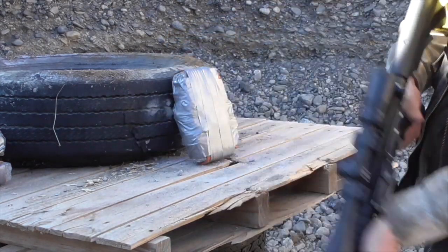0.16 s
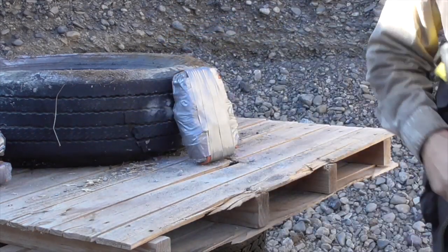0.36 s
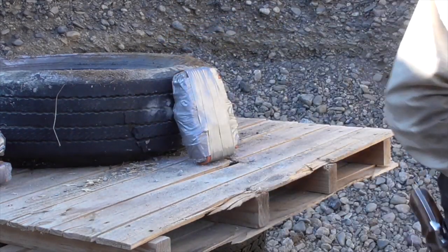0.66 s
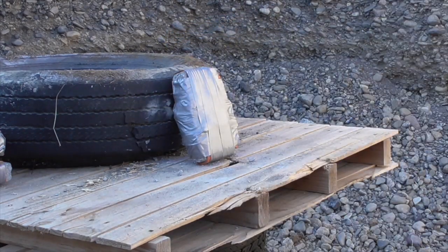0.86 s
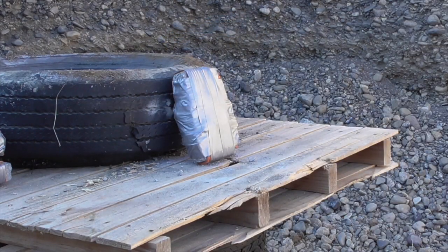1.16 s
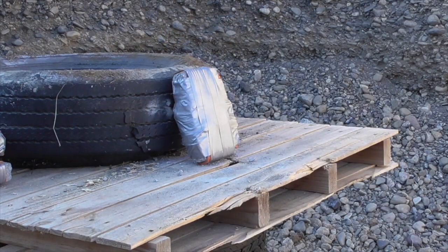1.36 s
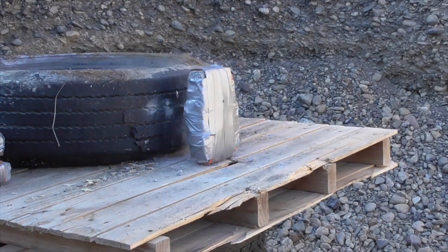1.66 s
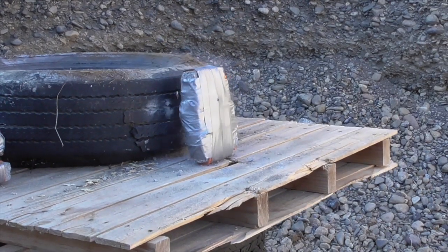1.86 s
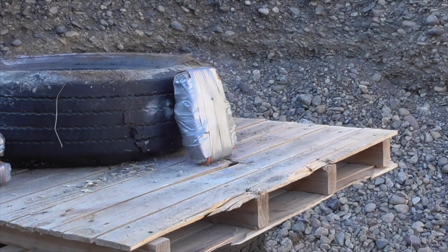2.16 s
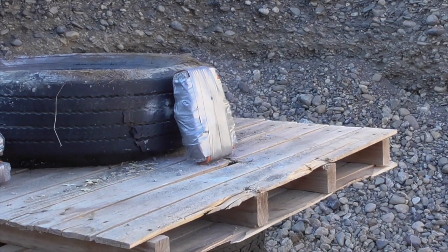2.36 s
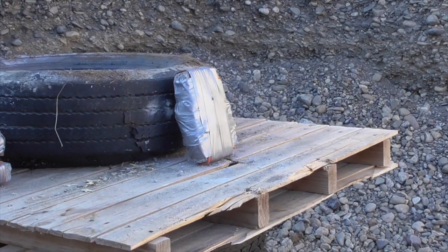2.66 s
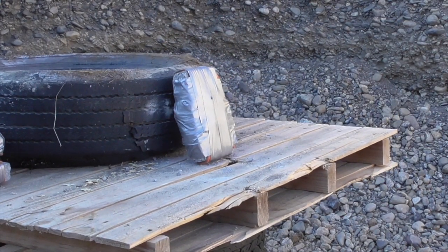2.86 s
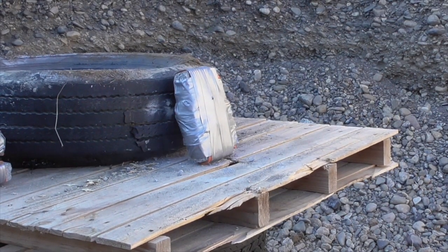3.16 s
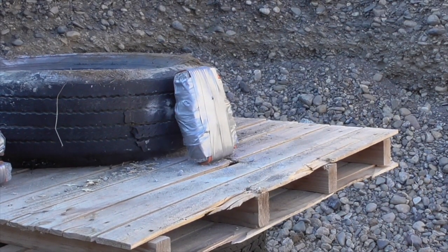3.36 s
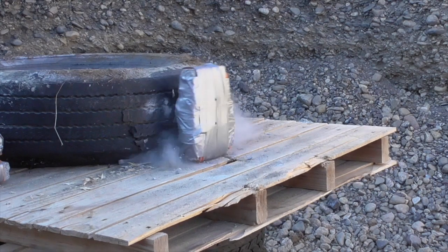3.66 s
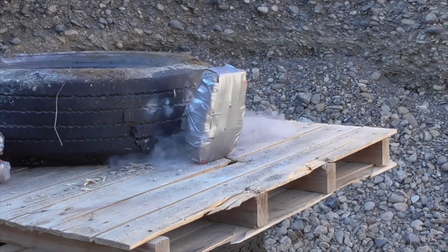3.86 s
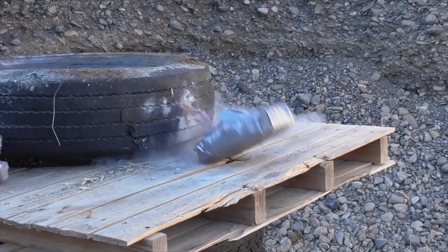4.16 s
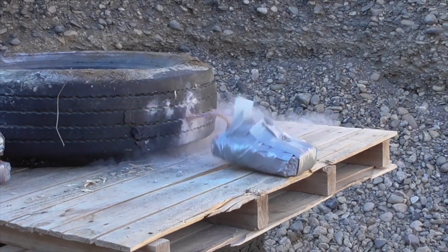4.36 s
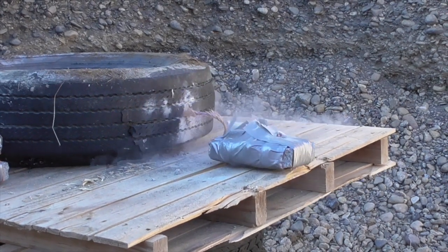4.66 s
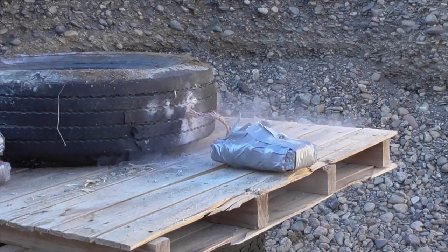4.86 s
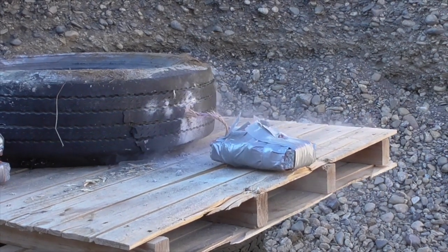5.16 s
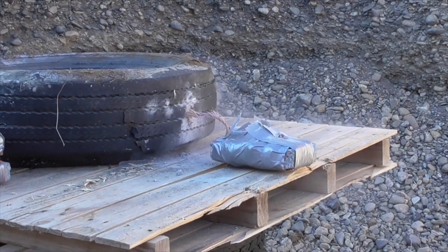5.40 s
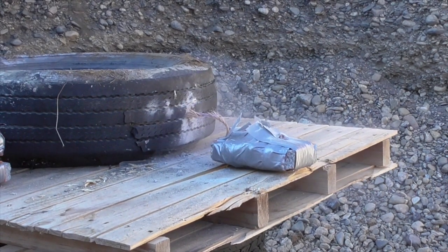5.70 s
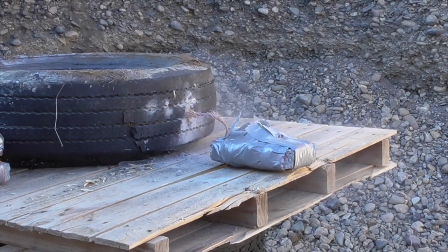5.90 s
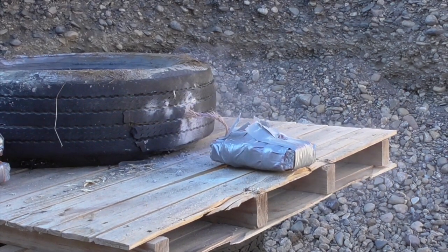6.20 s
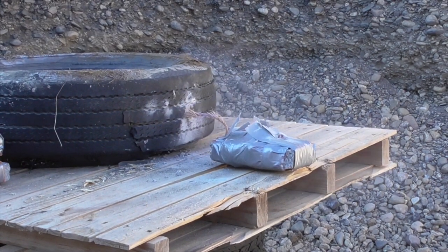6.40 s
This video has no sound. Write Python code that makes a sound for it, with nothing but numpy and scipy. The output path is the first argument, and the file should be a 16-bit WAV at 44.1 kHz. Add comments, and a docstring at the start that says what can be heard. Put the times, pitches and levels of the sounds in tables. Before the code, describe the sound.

Two rifle shots boom outdoors about two seconds apart, each followed by raining grit, snapping pebbles and knocks on wood.

```python
"""In a gravel pit, two rifle shots are fired at a taped package leaning on a tyre on a wooden pallet.
First the shooter shuffles aside. Each shot cracks, booms between the banks and rolls away.
Thrown grit hisses back down with snapping pebbles and crumbling clods. Stones and the package
knock on the pallet's boards, and spent brass cases ring as they hop on the gravel."""
import sys
import numpy as np
from scipy import signal
from scipy.fft import rfft, irfft, next_fast_len
from scipy.io import wavfile
from scipy.ndimage import uniform_filter1d, map_coordinates

SR = 44100
rng = np.random.default_rng(int(sys.argv[2]) if len(sys.argv) > 2 else 0)


def pcm_store(signal):
    """Save signal as 16-bit PCM."""
    levels = np.round(np.clip(np.atleast_2d(signal), -1, 1) * 32767)
    wavfile.write(sys.argv[1], SR, levels.astype(np.int16).T)


N = 288325

# The shots. Each row: start in seconds, level in dB.
SHOTS = [(1.5442, 0), (3.7044, 0)]
# Loudness shapes of a shot's four stages and the rifle's slide. Each lists delay, rise, hold and
# fade in seconds, then level in dB. A fade time (t60) is how long a sound takes to drop 60 dB.
CRACK_SHAPE = (0, .0003, .003, .02, -11)
FIZZ_SHAPE = (.002, .005, .035, .118, -16)
BOOM_SHAPE = (.0025, .005, .058, .135, -11)
ROLL_SHAPE = (.03, .03, .08, 1.05, -37.5)
SLIDE_SHAPE = (0, .002, .14, .7, -57.5)
# Hollow notes in the boom. Each row: pitch in Hz, level in dB, peak time and fade in seconds.
HOLLOW_NOTES = [(107, -17.5, .055, .25), (330, -7.5, .009, .09), (350, -13, .054, .12),
                (505, -6, .036, .08), (450, -15, .075, .17), (630, -12, .06, .07), (790, -16, .035, .1)]
# Metal left ringing by the blast. Each row: pitch in Hz, level in dB, fade in seconds.
METAL_RINGS = [(345, -35, 1.3), (877, -34, .7)]
# Echoes off far slopes. Each row: delay and length in seconds, start and end pitch in Hz, level in dB.
ECHOES = [(.27, .13, 145, 135, -44), (.437, .032, 265, 285, -37), (.487, .07, 245, 185, -39.5)]

# One shower of grit per shot. Each row: hiss and patter in dB, usual flight and end time in seconds.
SHOWERS = [(-41.3, -48.5, .7, 3.14), (-44, -49.5, .82, 6.6)]
# Larger pebbles, clods, the package and boots landing. Each row: start in seconds, level in dB.
PEBBLES = [(2.0087, -20), (2.114, -25), (2.7581, -23), (2.8604, -28), (2.9337, -23), (3.0874, -20),
           (3.4675, -43), (4.1577, -30), (4.2986, -19), (4.4618, -17), (4.8567, -27), (4.9496, -23),
           (5.0025, -18), (5.0594, -23), (5.1317, -30), (5.2794, -27), (5.3944, -28), (5.5593, -32),
           (5.7887, -15), (5.882, -27), (6.1574, -22), (6.2617, -17.5), (6.5059, -26)]
CLODS = [(1.964, -36), (2.297, -33), (2.318, -30), (2.455, -33), (2.478, -28), (4.655, -36), (4.947, -30),
         (5.288, -38), (5.562, -40), (5.677, -33), (5.793, -32), (6.087, -31), (6.197, -33), (6.337, -37),
         (6.441, -33), (6.525, -21)]
PACKAGE_THUDS = [(4.33, -31), (4.52, -43)]
STEPS = [(0.124, -37), (0.172, -35), (0.531, -36), (0.611, -30), (0.687, -38), (0.71, -35)]
# Blows on the pallet. Each row: start in seconds, level in dB, favoured pitch in Hz.
KNOCKS = [(1.933, -35, 1600), (2.009, -26, 1400), (2.162, -35, 470), (2.224, -20, 470), (2.365, -27, 484),
          (2.444, -22.5, 410), (4.28, -34, 1100), (4.319, -26, 420), (4.367, -14, 930), (4.385, -26, 360),
          (4.478, -23, 1100), (4.616, -35, 428), (4.68, -32, 1400), (4.789, -35, 1030), (4.916, -31, 720),
          (5.002, -29, 2200), (5.933, -27.5, 290)]
# The notes of the pallet's boards. Each row: pitch in Hz, width in Hz, level in dB.
BOARD_NOTES = [(135, 60, -7), (240, 70, -8), (370, 30, -4), (455, 20, 2), (585, 45, -7), (770, 80, -6),
               (870, 60, -7), (1090, 80, -7), (1400, 200, -15), (3400, 3000, -15)]
# Brass cases landing. Each row: start in seconds, level in dB, pitch in Hz,
# first hop in seconds (0 for a single ping with no hops added).
CASES = [(2.012, -19, 10300, 0), (2.365, -18.5, 11800, .508), (4.3156, -28, 11600, 0),
         (4.3914, -25, 11500, .12), (4.7531, -17.5, 11500, .555), (5.197, -37, 9100, 0)]
# Swings of arms and legs. Each row: middle and half length in seconds, level in dB.
SWINGS = [(.08, .1, -60), (.26, .09, -54), (.625, .035, -54), (.85, .04, -60), (.982, .035, -58),
          (6.17, .12, -58)]

# The tone of each noise, from bass to treble. Each row: frequency in Hz, level in dB.
CRACK_TONE = [(300, -25), (2500, -12), (5500, 0), (10000, -2), (16000, -14)]
FIZZ_TONE = [(800, -30), (1800, -2), (2700, -3), (4500, 0), (11000, -1), (15500, -6)]
BOOM_TONE = [(30, -34), (70, -11), (110, 0), (215, -6), (340, 0), (760, 0), (1000, -6), (1350, -8.5),
             (1900, -23), (4000, -45)]
ROLL_TONE = [(30, -24), (130, 0), (300, -2), (550, -9), (750, -18), (2500, -35), (15000, -44)]
SAND_TONE = [(700, -35), (1800, -16), (2700, -15), (4200, -3.5), (6000, -3.5), (7300, 0), (11500, -3),
             (15500, -14)]
PATTER_TONE = [(35, -30), (70, -10), (252, -2), (650, -5), (1300, -7), (2300, -15), (4000, -45)]
PEBBLE_TONE = [(400, -15), (2500, -14), (4000, -3), (8500, 0), (12000, -3), (16000, -15)]
WOOD_SLAP_TONE = [(400, -12), (1150, 1), (1900, -7), (3600, 0), (7000, -5), (13000, -20)]
SCUFF_TONE = [(50, -23), (200, 0), (620, -6), (950, 2), (1200, -6), (1900, -17), (6000, -35)]
CLOTH_TONE = [(1500, -16), (3300, 0), (9500, -1), (15000, -12)]
STEP_TONE = [(60, -20), (230, 0), (650, -7), (2800, -32)]
SLIDE_TONE = [(1500, -14), (2350, -17), (2600, 6), (2900, -12), (3700, 0), (4700, -1), (5700, -16),
              (12000, -28)]
AIR_TONE = [(25, -6), (60, 0), (300, -1), (700, -5), (950, 0), (1400, -9), (2800, -15), (7000, -11.5),
            (10000, -7)]
# How alike left and right sound. Each row: frequency in Hz, likeness (1 the same, 0 unrelated).
STEREO_LIKENESS = [(130, .3), (380, .75), (900, .45), (4500, .4), (8500, -.1), (15000, 0)]

# Flight times vary more for sand than for heavy grains; one octave here is a doubling of the time.
SAND_OCTAVES, GRAIN_OCTAVES = .65, .55


def shots():
    """Each shot cracks, fizzes, booms and rolls; the pit answers both with the same boom and echoes."""
    out, t = np.zeros((2, N)), np.arange(SR) / SR
    early = t[:SR // 3]
    boom = pit_boom(early)
    echoes = far_echoes(t)
    metal = sum(amp(db - 60 * t / t60) * np.sin(2 * np.pi * hz * t) for hz, db, t60 in METAL_RINGS)
    for s, db in SHOTS:
        crack = noise(CRACK_TONE, len(early)) * burst(early, *CRACK_SHAPE)
        # countless stones scatter the shock wave into a dense fizz
        fizz = noise(FIZZ_TONE, len(early), spiky_db=2) * burst(early, *FIZZ_SHAPE)
        roll = noise(ROLL_TONE, len(t)) * burst(t, *ROLL_SHAPE) * amp(2 * wobble(35, len(t)))
        add(out, s, amp(db) * (crack + fizz + boom))
        add(out, s, amp(db) * (echoes + metal + roll))
    return out


def pit_boom(t, wander=.75, build_s=.013):
    """The blast bounces between banks, tyre and pallet: a roar in which hollow notes swell in turn."""
    out = steady(noise(BOOM_TONE, len(t)), .012) * burst(t, *BOOM_SHAPE)
    for hz, db, peak_s, t60 in HOLLOW_NOTES:
        swell = np.exp(-(np.minimum(t - peak_s, 0) / min(build_s, peak_s / 2)) ** 2)
        fade = amp(db - 60 * np.maximum(t - peak_s, 0) / t60)
        phase = 2 * np.pi * (hz * t + rng.random()) + wander * stereo_wobble(55, len(t))
        out += swell * fade * np.sin(phase)
    return out


def far_echoes(t, rough=.6, flutter_per_s=90):
    """Far slopes send back only the bass, as short gliding rumbles roughened by the broken ground."""
    out = np.zeros((2, len(t)))
    flutter = lambda: rough * stereo_wobble(flutter_per_s, len(t))
    for delay, length, start_hz, end_hz, db in ECHOES:
        progress = np.clip((t - delay) / length / 2 + .5, 0, 1)
        phase = 2 * np.pi * np.cumsum(start_hz + (end_hz - start_hz) * progress) / SR
        rumble = np.sin(phase) * (1 + flutter()) + np.cos(phase) * flutter()
        out += amp(db) * np.sin(np.pi * progress) ** 4 * rumble
    return out


def grit(tick_db=-3, ticks_per_s=70, tick_scatter_db=5.5, clump_db=2):
    """Sand thrown up by the bullet rains down in clumps; coarser grains tick and patter through it."""
    hiss_gain, patter_gain = np.zeros((2, N))
    for (shot_s, _), (hiss_db, patter_db, flight_s, end_s) in zip(SHOTS, SHOWERS):
        hiss_gain += amp(hiss_db) * grit_flow(shot_s, flight_s, end_s, SAND_OCTAVES)
        patter_gain += amp(patter_db) * grit_flow(shot_s, flight_s, end_s, GRAIN_OCTAVES)
    landings = rng.random(N) < ticks_per_s / SR
    strengths = amp(tick_scatter_db * np.clip(rng.standard_normal(N), -2, 2))
    # each landing gets a very short tail
    contacts = signal.lfilter([1], [1, -np.exp(-1 / (.0007 * SR))], landings * strengths)
    ticks = spread(contacts * rng.standard_normal((2, N)), lambda hz: amp(along(PEBBLE_TONE, hz)))
    sand = amp(clump_db * wobble(40, N) - 1.7) * noise(SAND_TONE, N, spiky_db=3)
    patter = amp(2.5 * wobble(35, N)) * noise(PATTER_TONE, N, spiky_db=5)
    return hiss_gain * (sand + amp(tick_db) * ticks) + patter_gain * patter


def grit_flow(shot_s, flight_s, end_s, octaves, first_landing_s=.26, trickle_db=-11.8):
    """How thickly one shot's grit falls: it swells, then thins to a trickle running off the bank."""
    age = np.maximum(np.arange(N) / SR - shot_s, 1e-3)
    onset = 1 / (1 + (first_landing_s / age) ** 8)
    shower = onset * np.exp(-(np.log2(age / flight_s) / octaves) ** 2 / 2)
    trickle = amp(trickle_db) * np.minimum(age / flight_s, 1) ** .85
    return np.hypot(shower, trickle) * until(end_s)


def pebbles(snap_db=-2.8, crunch_db=-17, strays_per_shot=28, stray_db=-35, shortest_flight_s=.22):
    """Each pebble snaps as it lands and shifts its neighbours with a crunch."""
    out, t = np.zeros((2, N)), np.arange(SR // 8) / SR
    stones = list(PEBBLES)
    # small stray stones drop at random, harder while the shower is thick
    for (shot_s, _), (_, _, flight_s, end_s) in zip(SHOTS, SHOWERS):
        flow = grit_flow(shot_s, flight_s, end_s, SAND_OCTAVES)
        for _ in range(strays_per_shot):
            s = rng.uniform(shot_s + shortest_flight_s, min(end_s, N / SR))
            flow_db = 20 * np.log10(flow[int(s * SR)])
            stones.append((s, rng.normal(stray_db, 3) + .4 * flow_db))
    for s, db in stones:
        snap = steady(noise(PEBBLE_TONE, len(t)), .002)
        snap *= burst(t, .0005, .0002, .0006, .0055, db + snap_db)
        crunch = noise(PEBBLE_TONE, len(t), spiky_db=4) * burst(t, 0, .001, .005, .045, db + crunch_db)
        add(out, s, snap + crunch, pan_db=rng.normal(0, 2))
    return out


def pallet(knock_db=-8, focus_octaves=1.05, slap_db=-10.5, hard_hz=950, soft_hz=500):
    """Stones and the toppling package knock on the boards; stiff spots ring briefly and add a slap."""
    out, t = np.zeros((2, N)), np.arange(SR // 4) / SR
    for s, db, spot_hz in KNOCKS:
        # each spot brings out the board notes near its own pitch
        colour = lambda hz: boards(hz) / (1 + (np.log2((hz + 1) / spot_hz) / focus_octaves) ** 2)
        stiffness = max(spot_hz / soft_hz, 1)
        clatter = rng.standard_normal((2, len(t))) * burst(t * stiffness, 0, .0003, .016, .12, 0)
        ring = spread(clatter, colour)
        loudest = np.sqrt(uniform_filter1d(np.mean(ring ** 2, axis=0), SR // 80).max())
        hardness = min(spot_hz / hard_hz, 1) ** 3
        slap = noise(WOOD_SLAP_TONE, len(t), spiky_db=3)
        slap *= burst(t * stiffness ** 2, 0, .001, .025, .19, db + slap_db)
        add(out, s - .001, amp(db + knock_db) * ring / loudest + hardness * slap)
    # the heavy package bends the whole frame
    for s, db in PACKAGE_THUDS:
        thud = steady(noise([(35, -25), (80, 0), (220, -22)], len(t)), .03)
        add(out, s, thud * burst(t, 0, .006, .03, .3, db))
    return out


def boards(hz):
    """How the boards answer each frequency: they shake most near their own notes."""
    return sum((-1) ** k * amp(db) * 1j * hz * width / (pitch ** 2 - hz ** 2 + 1j * hz * width)
               for k, (pitch, width, db) in enumerate(BOARD_NOTES))


def brass(upper_hz=15300, hop_ratio=.23, hop_loss_db=16, shimmer=.95, roughness=1.7):
    """A spent case pings and hops, its two notes shimmering as it tumbles."""
    out, t = np.zeros((2, N)), np.arange(SR // 3) / SR
    strike = burst(t, 0, .0002, .007, t60=.1, db=-1)
    tumble = burst(t, 0, .01, .04, t60=.3, db=-20)
    upper = burst(t, 0, .001, .05, t60=.22, db=-48.5)
    for s, db, hz, hop_s in CASES:
        if not hop_s:  # a lone touch gives a short, rough ping
            add(out, s, amp(db) * case_note(t, hz, roughness) * strike)
            continue
        # each hop is shorter and each ping softer than the last
        for hop in range(3):
            landing_s = s + hop_s * (1 - hop_ratio ** hop) / (1 - hop_ratio)
            ping = amp(db - hop_loss_db * np.sqrt(hop)) * case_note(t, hz, shimmer)
            add(out, landing_s, ping * (strike + tumble) + upper * case_note(t, upper_hz, shimmer))
    return out


def case_note(t, hz, blur):
    """One note of a brass case, wavering in pitch and loudness."""
    side_shift = np.array([[0], [np.pi / 3]])
    phase = 2 * np.pi * hz * t + blur * wobble(500, len(t)) + side_shift
    return np.sin(phase) * amp(2.5 * wobble(120, len(t)))


def clods(rise_s=.004, hold_s=.01, t60=.05):
    """A clod lands and bursts into a short splash of sand."""
    out, t = np.zeros((2, N)), np.arange(SR // 8) / SR
    for s, db in CLODS:
        add(out, s, noise(SAND_TONE, len(t), spiky_db=3) * burst(t, 0, rise_s, hold_s, t60, db))
    return out


def shooter(shuffle_db=-65, shuffle_end_s=1.11, step_db=-7):
    """Boots scuff and tread while a jacket swishes with every swing, over a steady shuffle whose sound drops
    away quickly at 1.11 s."""
    clock = np.arange(N) / SR
    swings = sum(amp(db) * np.exp(-((clock - s) / half) ** 2) for s, half, db in SWINGS)
    shuffle = amp(shuffle_db) * until(shuffle_end_s)
    scuff_gain = np.hypot(amp(4) * swings, amp(8) * shuffle)
    scuffs = amp(2.8 * wobble(40, N)) * scuff_gain * noise(SCUFF_TONE, N, spiky_db=4)
    jacket = np.hypot(swings, shuffle) * noise(CLOTH_TONE, N, spiky_db=3)
    out, t = scuffs + jacket, np.arange(SR // 5) / SR
    for s, db in STEPS:
        add(out, s, steady(noise(STEP_TONE, len(t)), .01) * burst(t, 0, .003, .009, .09, db + step_db))
    return out


def rifle_slide(sag_octaves_per_s=1.9):
    """The rifle scrapes along the sleeve; the scrape sinks in pitch as it slows."""
    out, t = np.zeros((2, N)), np.arange(SR) / SR
    travel = np.cumsum(2 ** (-sag_octaves_per_s * t))
    sleeve = noise(SLIDE_TONE, len(t), spiky_db=2)
    scrape = np.array([map_coordinates(side, [travel], mode="wrap") for side in sleeve])
    add(out, 0, scrape * burst(t, *SLIDE_SHAPE))
    return out


def air(air_db=-64):
    """The faint, even hush of open air."""
    return amp(air_db) * noise(AIR_TONE, N)


def amp(db):
    """Turn decibels into a gain."""
    return 10 ** (np.asarray(db) / 20)


def along(points, hz):
    """Read between rows of (Hz, value), with octaves evenly spaced."""
    freqs, values = np.transpose(points)
    return np.interp(np.log(hz + 1), np.log(freqs + 1), values)


def wobble(rate, size):
    """A smooth curve through `rate` random points a second."""
    knots = rng.standard_normal(4096)
    coarse = np.arange(0, size + 32, 32)
    return np.interp(np.arange(size), coarse, map_coordinates(knots, [coarse * rate / SR], mode="wrap"))


def stereo_wobble(rate, size):
    """A separate wobble for left and right."""
    return np.array([wobble(rate, size), wobble(rate, size)])


def filtered(x, response):
    """Scale each frequency in x by response(hz)."""
    size = x.shape[-1]
    padded = next_fast_len(size + 1024, True)
    return irfft(rfft(x, padded) * response(np.fft.rfftfreq(padded, 1 / SR)), padded)[..., :size]


def spread(pair, response):
    """Filter two unrelated signals and blend them to left and right, at an average power of 1."""
    def blend(hz):
        angle = np.arccos(np.clip(along(STEREO_LIKENESS, hz), -1, 1)) / 2
        return response(hz) * np.array([np.cos(angle), np.sin(angle)])
    mid, side = filtered(pair, blend)
    stereo = np.array([mid + side, mid - side])
    return stereo / np.sqrt(np.mean(stereo ** 2) + 1e-20)


def noise(tone, size, spiky_db=0):
    """Stereo noise with a given tone; spiky_db breaks it into grains of unequal loudness."""
    scatter = np.clip(rng.standard_normal(size // 16 + 1), -3, 3)
    grains = amp(spiky_db * np.repeat(scatter, 16)[:size])
    return spread(grains * rng.standard_normal((2, size)), lambda hz: amp(along(tone, hz)))


def steady(x, span):
    """Even out the chance swells of a noise over span seconds."""
    power = uniform_filter1d(np.mean(x ** 2, axis=0), max(int(span * SR), 2))
    return x / np.sqrt(np.abs(power) + 1e-9)


def burst(t, delay, rise, hold, t60, db):
    """A loudness shape that rises, holds and then dies away."""
    age = np.maximum(t - delay, 0)
    fade = np.exp(-np.logaddexp(0, np.log(1e6) * (age - hold) / t60) / 2)
    return amp(db) * (1 - np.exp(-age / rise)) * fade


def until(end_s, soften_s=.012):
    """A gain that drops quickly from 1 to 0 at end_s."""
    return (1 - np.tanh((np.arange(N) / SR - end_s) / soften_s)) / 2


def add(out, s, x, pan_db=0):
    """Mix x into out at s seconds; a positive pan_db moves it left."""
    start = max(round(s * SR), 0)
    panned = x * amp([[pan_db / 2], [-pan_db / 2]])
    out[:, start:start + x.shape[-1]] += panned[:, :N - start]


def scene():
    """All the sounds of the pit together."""
    return shots() + shooter() + rifle_slide() + grit() + pebbles() + clods() + pallet() + brass() + air()


def record(dry):
    """Round off the loudest peaks and cut the treble above 15700 Hz."""
    rounded = dry / (1 + dry ** 6) ** (1 / 6)
    return filtered(rounded, lambda hz: 1 / np.sqrt(1 + (hz / 15700) ** 160))


dry = scene()
out = record(dry)
pcm_store(out)
```